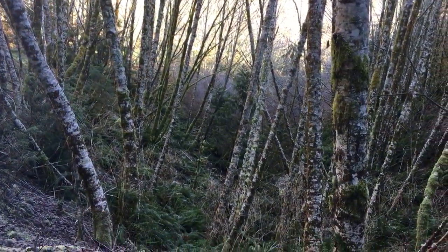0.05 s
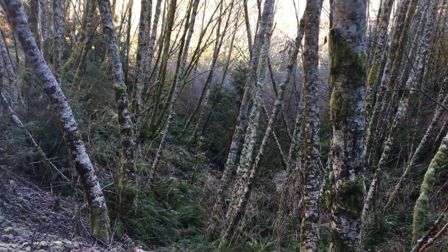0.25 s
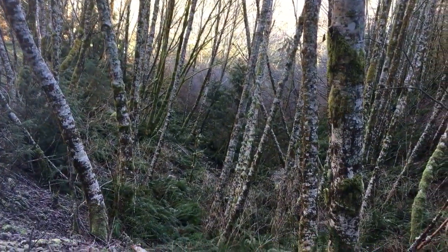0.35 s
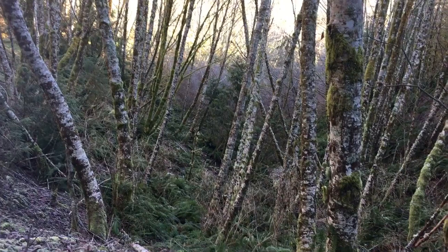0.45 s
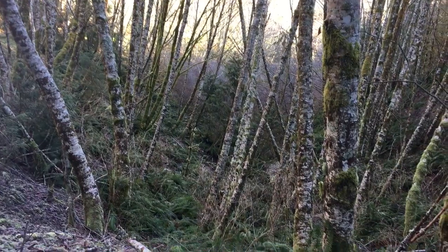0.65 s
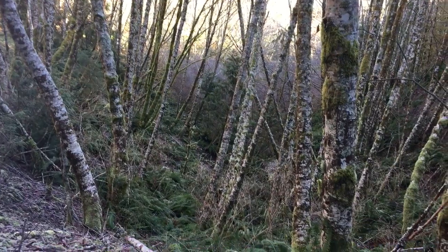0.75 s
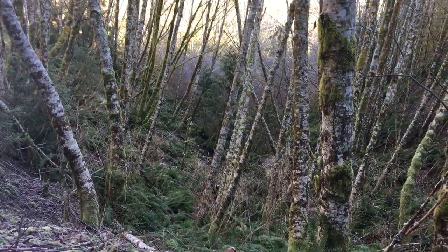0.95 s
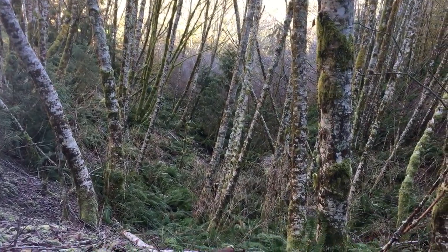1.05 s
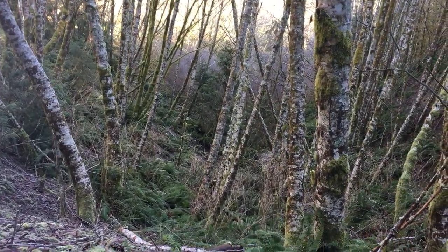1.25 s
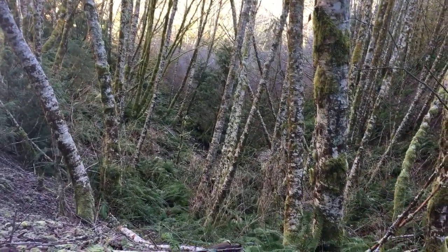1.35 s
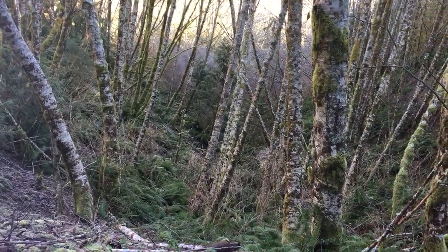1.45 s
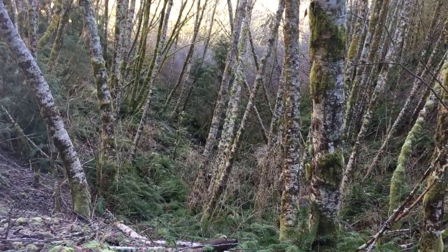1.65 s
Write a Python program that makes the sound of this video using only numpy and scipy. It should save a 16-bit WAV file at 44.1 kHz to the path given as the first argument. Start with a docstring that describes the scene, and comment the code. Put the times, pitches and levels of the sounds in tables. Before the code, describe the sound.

A single crisp crack, like a twig breaking near the microphone, dies away quickly in quiet woodland. Afterwards there are only faint clicks and low bumps of camera handling, while a soft, distant rush continues throughout.

```python
"""One sharp, woody snap sounds close by in a quiet wood and scatters briefly among the trunks.
The snap is an impulse response: a short crack and the heavily damped modes that it excites.
Handling a hand-held camera adds a few tiny resonant ticks and soft, low bumps of its body.
Behind them lies a steady, soft rush like a distant creek, broadband noise over a low rumble of air."""
import sys
import numpy as np
from scipy import signal
from scipy.fft import rfft, irfft
from scipy.io import wavfile
from scipy.ndimage import uniform_filter1d

SR = 44100
rng = np.random.default_rng(int(sys.argv[2]) if len(sys.argv) > 2 else 0)


def put_to_file(sound):
    """Save the sound as 16-bit audio at rate SR, in the file named by the first command-line argument."""
    columns = np.atleast_2d(sound).T  # one column per channel
    safe = np.clip(columns, -1, 1)
    whole_steps = np.round(safe * 32767)
    wavfile.write(sys.argv[1], SR, whole_steps.astype(np.int16))


N = 74970

# Modes of the snap. Each row: frequency in Hz, peak level in dB, time to peak in seconds,
# steepness of the envelope as an exponent.
SNAP_MODES = [(1680, -12.5, .00115, 5.8), (1827, -30.1, .00163, .86), (2067, -15.1, .00092, 11.7),
              (2646, -22.3, .00091, 12), (3550, -54, .0024, .7), (3930, -38.6, .00059, .7),
              (5180, -45.5, .00045, .75), (6900, -48, .0012, 7), (8800, -47, .0006, 12)]
# Spectrum of the opening crack. Each row: frequency in Hz, relative density in dB.
CRACK_SPECTRUM = [(300, -27), (900, -20), (2500, -1), (4000, -7), (6000, -9), (8000, -11), (10500, -8),
                  (12000, -7), (13000, -16), (16000, -12)]
# Spectrum of the scatter from ground and trunks. Each row: frequency in Hz, relative density in dB.
SCATTER_SPECTRUM = [(300, -43), (900, -8.5), (1400, 4.5), (2000, -0.5), (2900, -12.5), (4000, -19),
                    (7000, -33), (16000, -42)]
# Handling ticks. Each row: start in seconds, energy level in dB, centre in Hz, width in octaves,
# time for the crackle to fall 60 dB in seconds, upper edge in Hz.
TICKS = [(.5996, -39, 7000, 0.23, 0.0056, 15500), (.6014, -36, 7660, 0.19, 0.0073, 15800),
         (0.603, -32, 5500, 0.16, 0.009, 12000), (.6270, -51.5, 12500, .25, 0.006, 15000),
         (.6858, -34.5, 2700, .9, 0.009, 12000), (.8772, -40.5, 6140, .25, 0.012, 15500),
         (1.282, -48, 9500, .3, 0.008, 11500), (1.3920, -34, 4030, 0.75, .011, 9000),
         (1.5280, -51, 7000, .4, .005, 14000), (1.5779, -36, 11500, 0.036, .006, 12500)]
# Bumps on the camera body. Each row: start in seconds, peak level in dB, starting pitch in Hz.
BUMPS = [(.146, -53, 390), (.156, -57.5, 186), (.310, -54.5, 340), (.363, -48.5, 290), (.439, -55.5, 173),
         (.591, -53, 285), (.624, -52, 288), (.693, -52, 292), (.746, -55, 217), (.751, -51.5, 350),
         (.968, -53.5, 290), (.998, -46.5, 250), (1.006, -55, 178), (1.037, -55, 318), (1.155, -51, 250),
         (1.271, -50, 320), (1.323, -52, 276), (1.426, -57, 230), (1.502, -47, 270), (1.566, -50.5, 300),
         (1.605, -51, 260), (1.623, -47.5, 255), (1.653, -56, 200)]
# Spectrum of the distant rush. Each row: frequency in Hz, relative density in dB.
RUSH_SPECTRUM = [(240, -28), (380, -4), (470, -7.5), (560, -5), (800, -4), (1050, 0.5), (1700, -.5),
                 (2000, -3), (2450, -5), (2950, -12.5), (3200, -8), (3800, -8.5), (4900, -16), (5400, -16),
                 (6700, -18), (7800, -23), (9000, -21.5), (10400, -29), (11400, -28), (13000, -29),
                 (15800, -35.5)]
# Spectrum of the rumble of the air. Each row: frequency in Hz, relative density in dB.
RUMBLE_SPECTRUM = [(20, -28), (35, -10), (55, 2), (85, 5), (130, -3), (250, -2), (380, -7), (600, -38.5)]

SNAP_START_S = .2234
CRACK_DB, CRACK_RISE_S, CRACK_T60_S = -40.5, 0.00028, 0.0068
SCATTER_RISE_S = 0.0087
NEAR_DB, NEAR_T60_S, FAR_DB, FAR_T60_S = -45, 0.052, -53, 0.3
TICK_CRACKLE_GAIN, TICK_SKIRT_DB, TICK_ROLLOFF_DB_PER_OCT = 0.16, -10, 40
BUMP_SWELL_CYCLES, BUMP_SAG_CYCLES, BUMP_END_PITCH_RATIO = 1.07, 1.38, 0.24
RUSH_DB, PATCH_DB, FLICKER_DB = -57.5, 1.0, 0.68
RUMBLE_DB = -65
BAND_LIMIT_HZ = 15900


def snap():
    """Impulse excitation: a brief crack sets off heavily damped modes, and its scatter follows."""
    t = np.arange(SR // 3) / SR
    ring = 0
    for hz, db, peak_s, steepness in SNAP_MODES:
        envelope = (t / peak_s * np.exp(1 - t / peak_s)) ** steepness
        ring += amp(db) * envelope * np.sin(2 * np.pi * hz * t)
    attack = np.minimum(t / CRACK_RISE_S, 1) ** 2
    crack = noise(CRACK_SPECTRUM, len(t)) * attack * amp(CRACK_DB - 60 * t / CRACK_T60_S)
    return ring + crack + scatter(t)


def scatter(t):
    """Diffuse reflection: echoes from near and far trunks merge into noise with two decay rates."""
    build_up = np.minimum(t / SCATTER_RISE_S, 1)
    near = amp(NEAR_DB - 60 * t / NEAR_T60_S)
    far = amp(FAR_DB - 60 * t / FAR_T60_S)
    return noise(SCATTER_SPECTRUM, len(t)) * build_up * (near + far)


def tick(db, centre_hz, width_oct, t60_s, top_hz):
    """Resonant filtering: a tiny click and a few milliseconds of crackle pass through one resonance."""
    t = np.arange(2048) / SR
    hz = np.geomspace(200, 20000, 120)
    resonance = np.exp(-.5 * (np.log2(hz / centre_hz) / width_oct) ** 2)
    rolloff_db = TICK_ROLLOFF_DB_PER_OCT * np.maximum(np.log2(hz / top_hz), 0)
    gain_db = 20 * np.log10(resonance + amp(TICK_SKIRT_DB)) - rolloff_db
    drive = TICK_CRACKLE_GAIN * rng.standard_normal(len(t)) * amp(-60 * t / t60_s)
    drive[0] += 1  # the click itself
    click = coloured(np.column_stack([hz, gain_db]), drive)
    return amp(db) * click / np.linalg.norm(click)


def bump(db, start_hz):
    """Gliding oscillation: a soft, low bump of handling swells and dies in a few cycles while its pitch sinks."""
    cycles = start_hz * np.arange(SR // 12) / SR
    sag = np.exp(-cycles / BUMP_SAG_CYCLES)
    hz = start_hz * (BUMP_END_PITCH_RATIO + (1 - BUMP_END_PITCH_RATIO) * sag)
    age = cycles / BUMP_SWELL_CYCLES
    return amp(db) * age * np.exp(1 - age) * np.sin(2 * np.pi * np.cumsum(hz) / SR)


def rush():
    """Modulated noise: faint patches drift in the spectrum of a distant rush and its level flickers."""
    frames = N // 128 + 6
    hz = np.fft.rfftfreq(512, 1 / SR)
    real, imag, patches = rng.standard_normal((frames, len(hz), 3)).T
    patches = uniform_filter1d(patches, size=14, axis=1)  # smooth over time
    patches = unit_rms(uniform_filter1d(patches, size=6, axis=0))  # and over frequency
    flicker = unit_rms(uniform_filter1d(rng.standard_normal(frames), size=6))
    level_db = level_at(RUSH_SPECTRUM, hz)[:, None] + PATCH_DB * patches + FLICKER_DB * flicker
    wash = signal.istft((real + 1j * imag) * amp(level_db), nperseg=512, noverlap=384)[1][:N]
    return amp(RUSH_DB) * unit_rms(wash)


def rumble():
    """Stationary noise: the air rumbles steadily, with its energy at low frequencies."""
    return amp(RUMBLE_DB) * noise(RUMBLE_SPECTRUM, N)


def noise(spectrum, size):
    """Spectral shaping: white noise takes on the given spectrum, at an rms of one."""
    gain = amp(level_at(spectrum, np.fft.rfftfreq(size, 1 / SR)))
    return unit_rms(irfft(rfft(rng.standard_normal(size)) * gain, size))


def coloured(spectrum, drive):
    """Minimum-phase filtering: the drive passes through a causal filter with the given spectrum."""
    hz = abs(np.fft.fftfreq(2048, 1 / SR))
    log_gain = np.log(amp(level_at(spectrum, hz)) + 1e-5)
    response = np.fft.ifft(np.exp(np.conj(signal.hilbert(log_gain)))).real[:1024]
    return signal.fftconvolve(drive, response / np.linalg.norm(response))[:len(drive)]


def level_at(spectrum, hz):
    """Interpolation of a spectrum in dB along a log-frequency axis."""
    points_hz, points_db = np.transpose(spectrum)
    return np.interp(np.log(hz + 1), np.log(points_hz + 1), points_db)


def amp(db):
    """Conversion of decibels to an amplitude ratio."""
    return 10 ** (np.asarray(db) / 20)


def unit_rms(x):
    """Normalisation to an rms of one."""
    return x / np.sqrt(np.mean(x ** 2) + 1e-20)


def add(mix, start_s, sound):
    """Delay and sum: a sound joins the mix at its start time."""
    part = mix[round(start_s * SR):][:len(sound)]
    part += sound[:len(part)]


def scene():
    """Superposition: the snap, ticks and bumps add to the rush and rumble in one channel."""
    mix = rush() + rumble()
    add(mix, SNAP_START_S, snap())
    for start_s, *row in TICKS:
        add(mix, start_s, tick(*row))
    for start_s, *row in BUMPS:
        add(mix, start_s, bump(*row))
    return mix[None]


def record(dry):
    """Low-pass filtering: the band limit of the camera removes the highest treble."""
    lowpass = signal.firwin(511, BAND_LIMIT_HZ, window=("kaiser", 9), fs=SR)
    return signal.oaconvolve(dry, lowpass[None], "same")


dry = scene()
out = record(dry)
put_to_file(out)
```